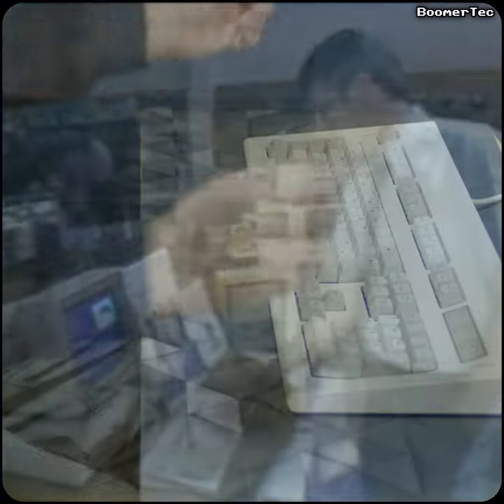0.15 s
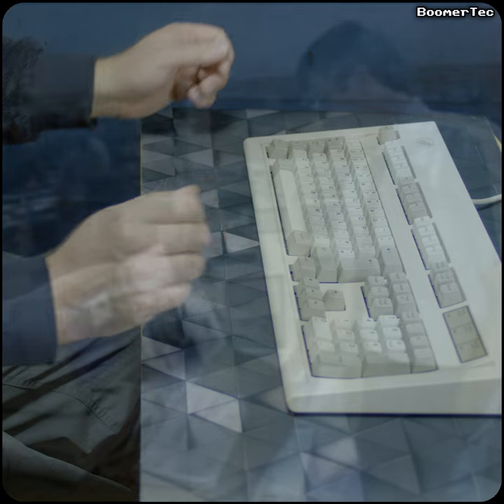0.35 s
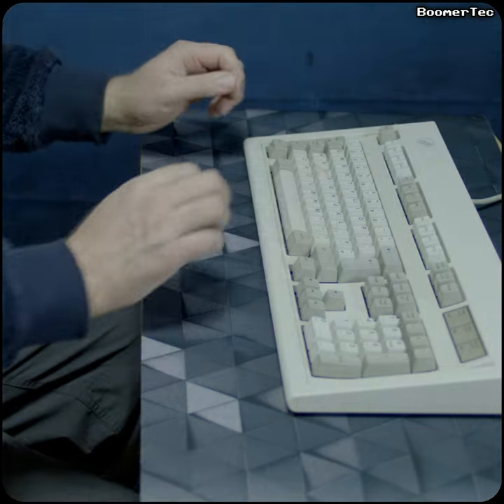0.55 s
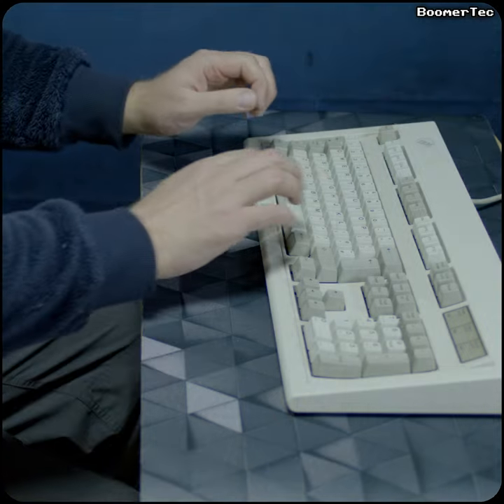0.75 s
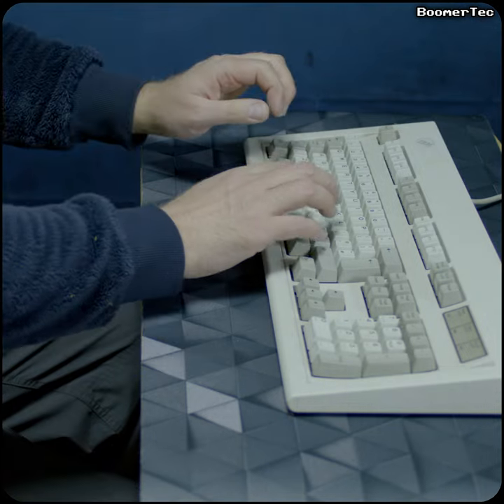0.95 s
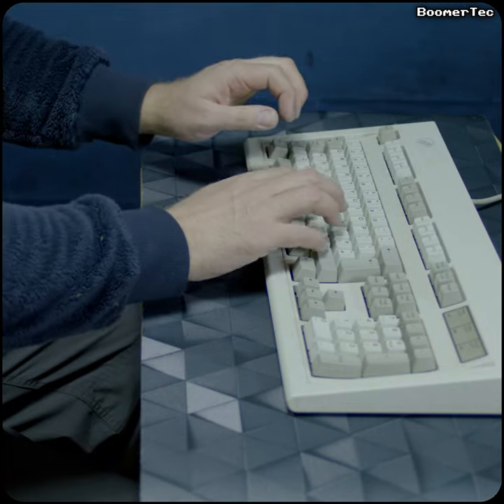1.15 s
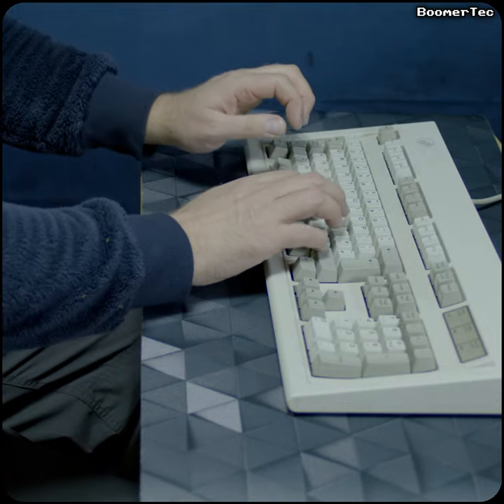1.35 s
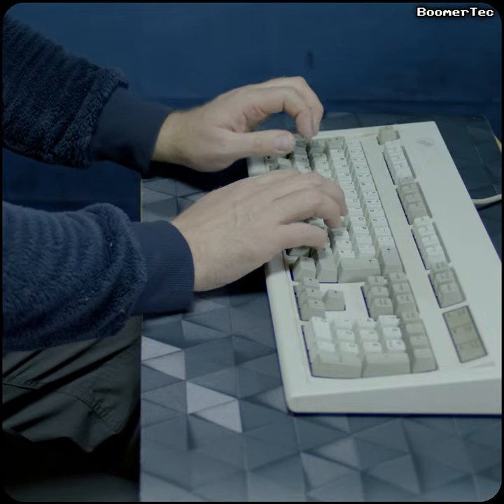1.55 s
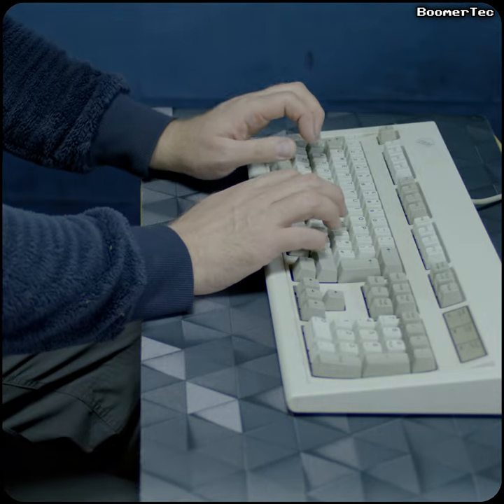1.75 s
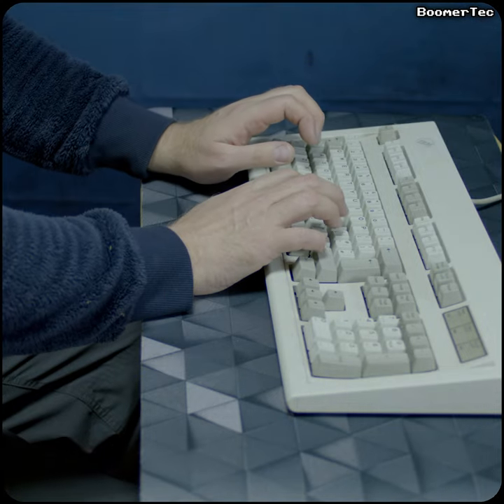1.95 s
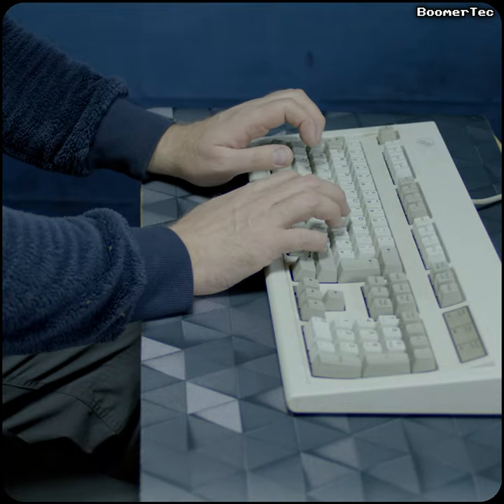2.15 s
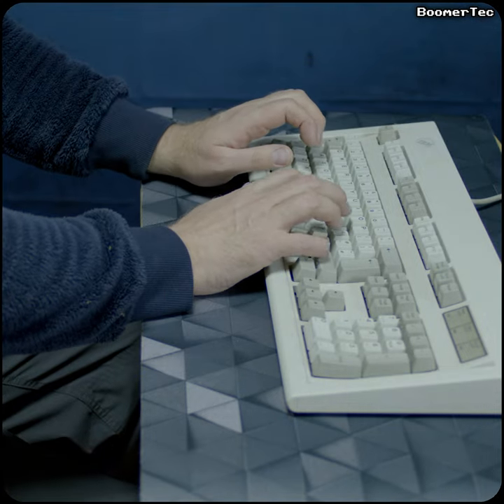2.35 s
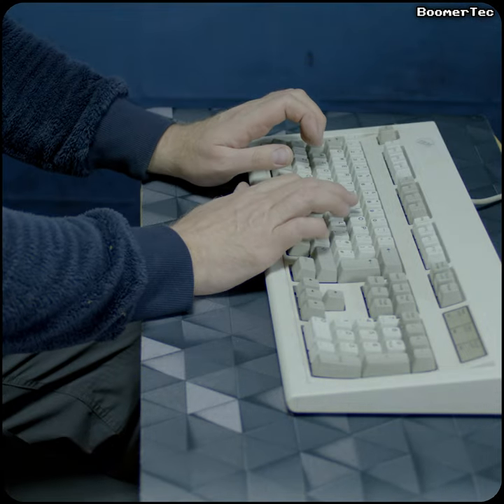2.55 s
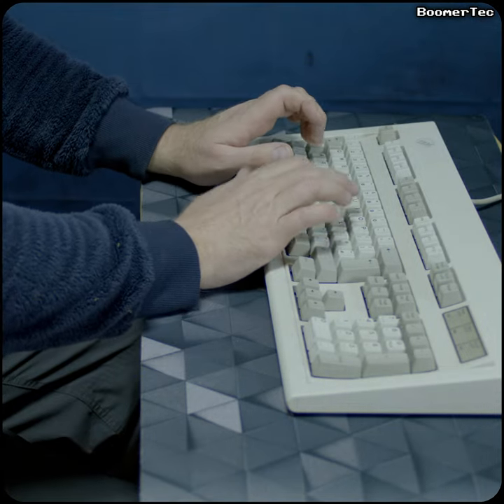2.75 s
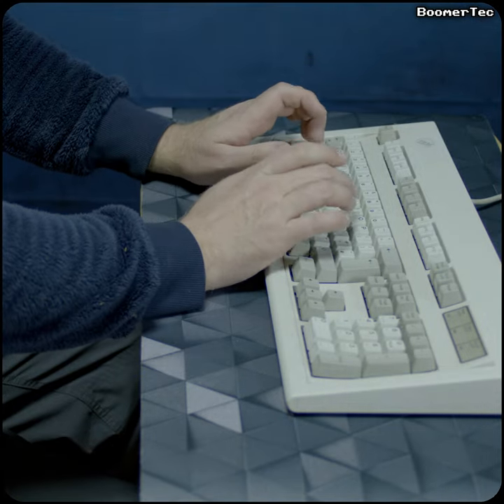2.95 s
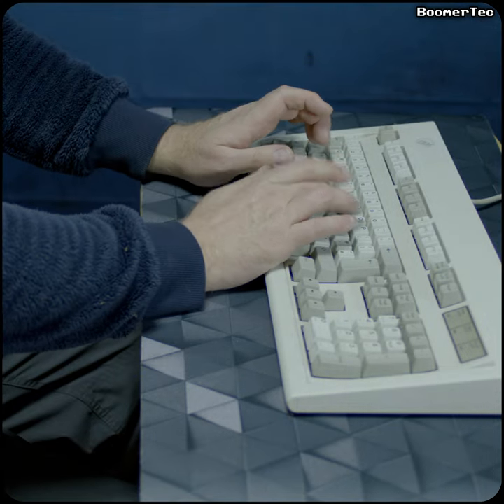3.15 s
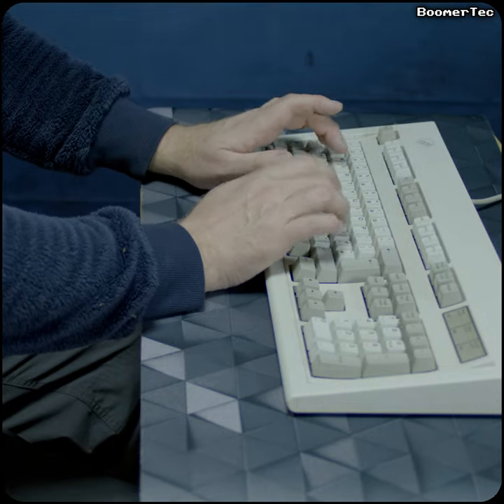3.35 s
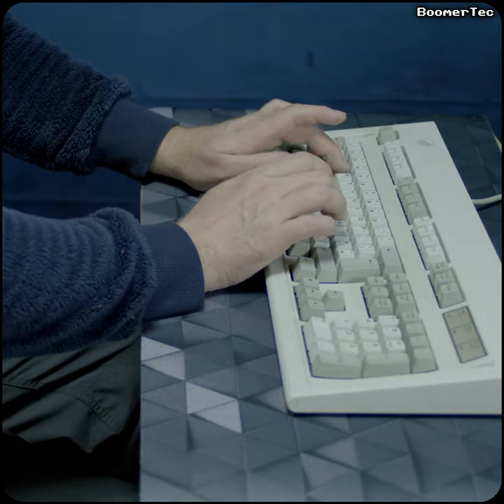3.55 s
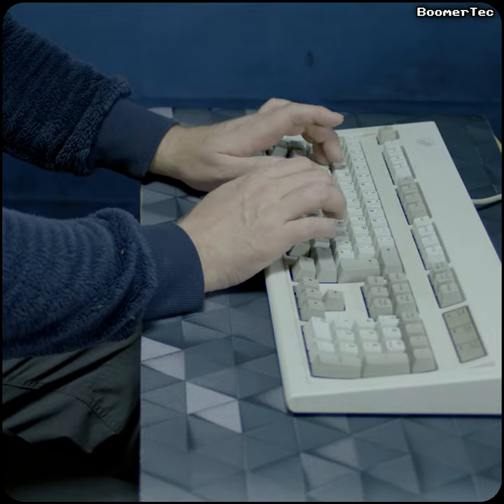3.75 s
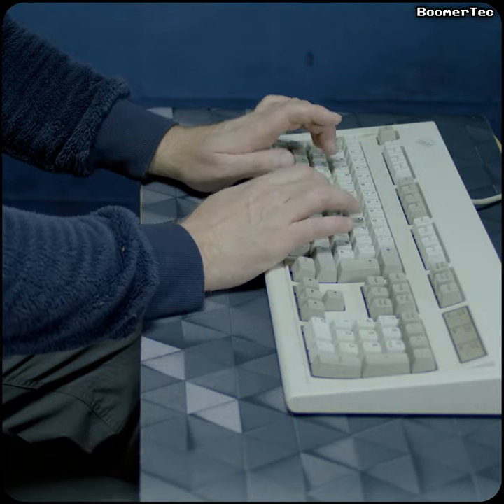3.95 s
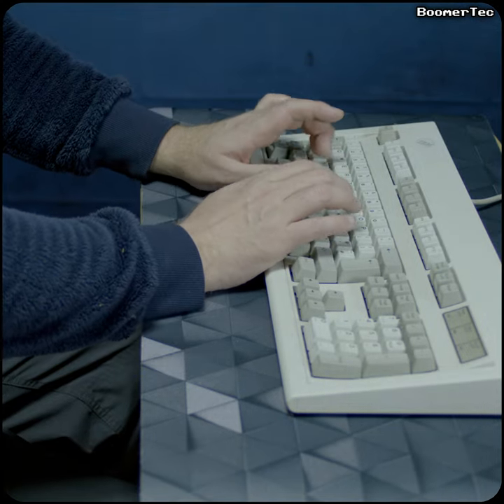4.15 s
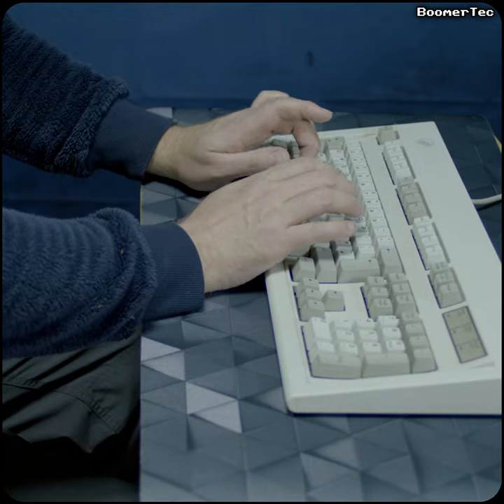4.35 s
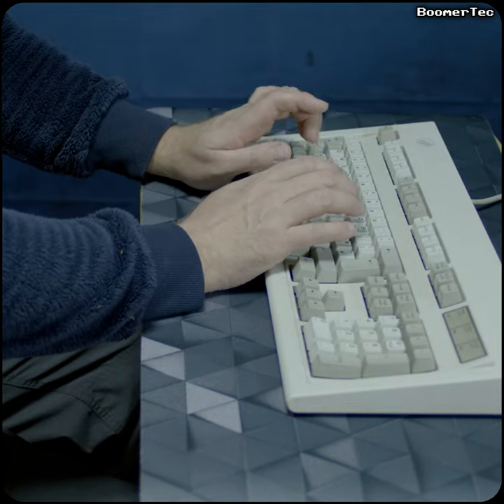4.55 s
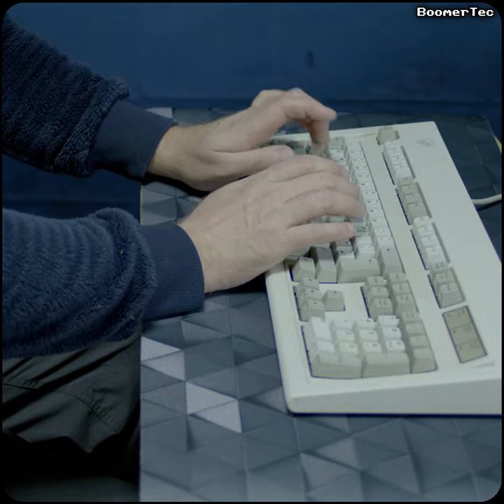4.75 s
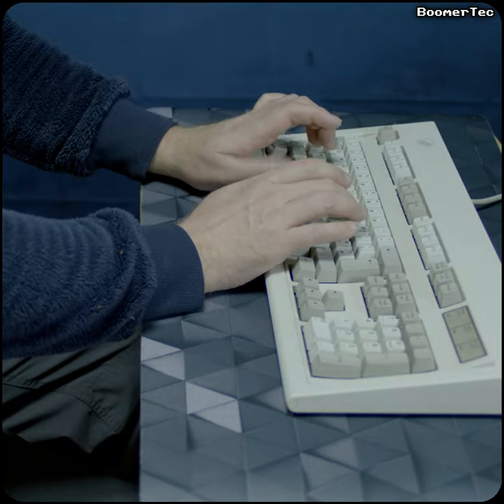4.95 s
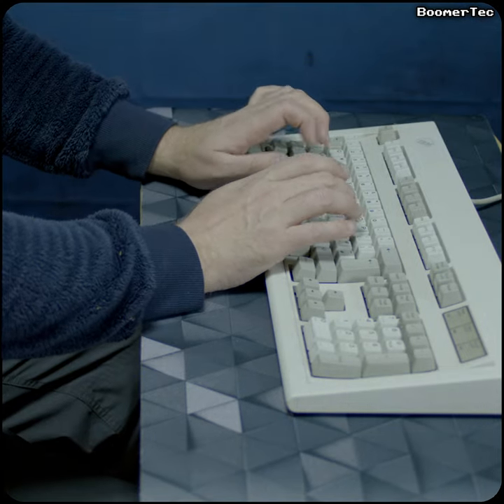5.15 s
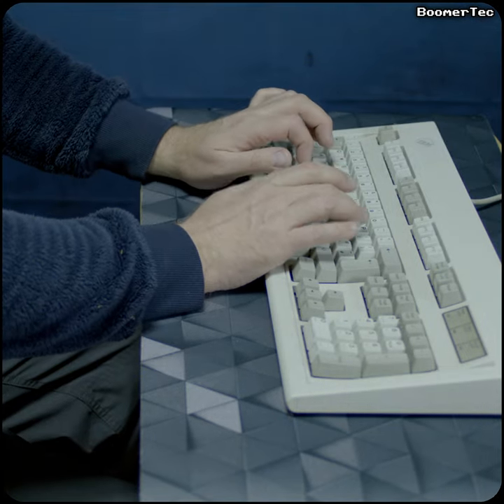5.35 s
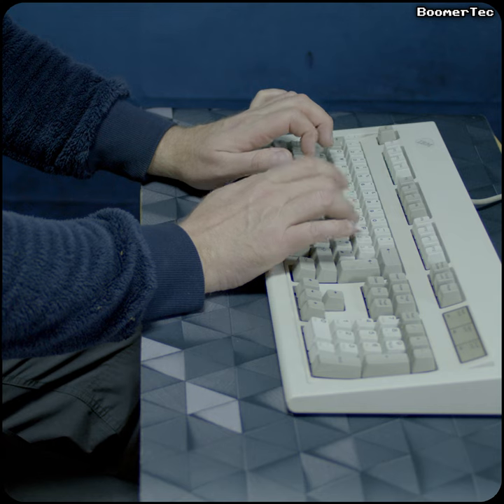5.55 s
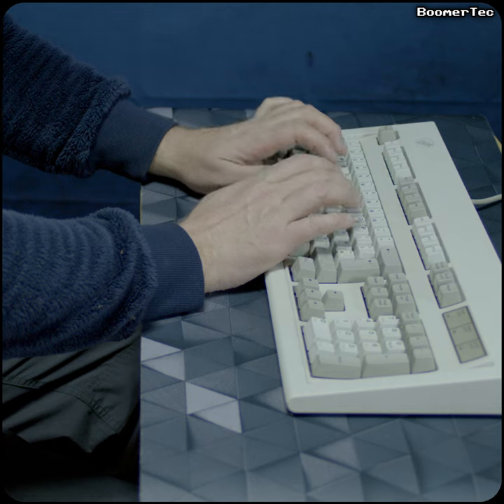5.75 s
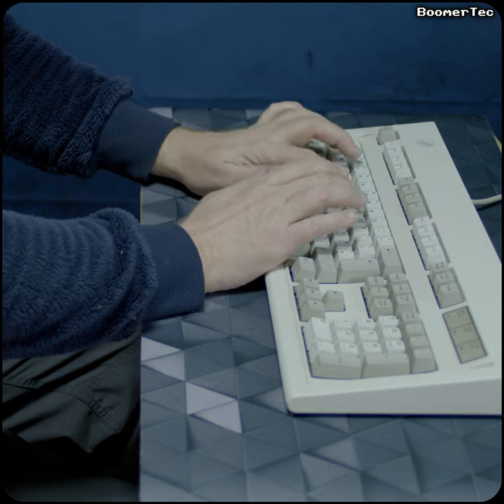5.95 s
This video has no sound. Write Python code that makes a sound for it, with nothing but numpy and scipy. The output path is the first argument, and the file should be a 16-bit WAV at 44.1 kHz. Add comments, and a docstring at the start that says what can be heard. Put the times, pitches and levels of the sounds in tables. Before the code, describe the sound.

Quiet room air with faint hiss, then a few barely audible scuffs as hands settle on a keyboard. After two seconds a few lighter clicks sound, then, following a short pause, fast bursts of crisp spring clacks with dull knocks. The space bar lands heavier and rattles on its wire as it rises. Close microphone, small dry room, almost mono, leaning slightly left.

```python
"""Faint hiss over low room air comes first, then a few soft scuffs of the hands, then fast typing in bursts.
The clicky spring keyboard lies on a desk in a small, dry room: shaped noise makes the hiss and the scuffs.
Each stroke is two noise bursts, a click and a dull knock (fingertip or landing), that ring cap and case.
The space bar lands harder and its wire rattles on the way up; a few springs sing on as decaying sines."""
import sys
import numpy as np
from scipy import signal
from scipy.fft import rfft, irfft, next_fast_len
from scipy.io import wavfile
from scipy.ndimage import uniform_filter1d

SR = 44100
rng = np.random.default_rng(int(sys.argv[2]) if len(sys.argv) > 2 else 0)


def wav_record(signal):
    """Record a signal, one row per channel, as 16-bit PCM in the file named by sys.argv[1]."""
    frames = np.transpose(np.atleast_2d(signal))
    bounded = np.clip(frames, -1, 1)
    # unit amplitude maps onto the largest positive 16-bit level
    quanta = np.round(bounded * 32767).astype(np.int16)
    wavfile.write(sys.argv[1], SR, quanta)


N = 265041


def amp(db):
    """Level law: decibels to amplitude gain."""
    return 10 ** (np.asarray(db) / 20)


def unit(x):
    """Power normalisation: x at rms 1."""
    return x / np.sqrt(np.mean(x ** 2) + 1e-20)


def along(points, hz):
    """Logarithmic frequency scale: (Hz, value) points interpolated along log frequency."""
    f, v = np.transpose(points)
    return np.interp(np.log(hz + 1), np.log(f + 1), v)


def filtered(x, response):
    """Linear filtering: the spectrum of x times a complex response of frequency."""
    n = x.shape[-1]
    padded = 2 * next_fast_len(n * 3 // 4)
    hz = np.fft.rfftfreq(padded, 1 / SR)
    return irfft(rfft(x, padded) * response(hz), padded)[..., :n]


def colour(points, hz):
    """Minimum phase: a causal response with the gains of (Hz, dB) points, silent before the blow."""
    cepstrum = irfft(np.log(amp(along(points, hz))))
    half = len(cepstrum) // 2
    # folding the cepstrum onto positive time makes the response causal
    cepstrum[1:half] *= 2
    cepstrum[half + 1:] = 0
    return np.exp(rfft(cepstrum))


def resonance(modes, hz):
    """Modal superposition: summed damped oscillators, each (Hz, width in Hz, peak dB)."""
    return sum(amp(db) * 1j * hz * w / (f * f - hz * hz + 1j * hz * w) for f, w, db in modes)


def add(out, s, sound):
    """Superposition: mix a sound in at s seconds."""
    start = round(s * SR)
    out[start:start + len(sound)] += sound


def background():
    """Stationary noise: faint hiss over the low murmur of the room's air, drifting slowly in level."""
    # Spectrum of hiss and air. Each row: frequency in Hz, relative density in dB.
    hiss_spectrum = [(20, -14), (60, -1.5), (150, -1.5), (470, -7), (1500, -10.5), (4100, -14.5),
                     (15800, -16.5)]
    # Level of the background. Each row: time in seconds, level in dB.
    quiet_level = [(0, -63.5), (.2, -68), (.7, -70), (1.1, -67.5), (1.6, -63.5), (6, -63)]
    level_db = np.interp(np.arange(N) / SR, *np.transpose(quiet_level))
    hiss = filtered(rng.standard_normal(N), lambda hz: amp(along(hiss_spectrum, hz)))
    return amp(level_db) * unit(hiss)


def brushes(attack_s=0.0038, t60_s=0.17):
    """Friction noise: hands settle on the keys with a few soft, narrow-band, decaying scuffs."""
    # Light brushes before typing. Each row: start in seconds, centre in Hz, width in Hz, gain in dB.
    scuffs = [(.645, 11800, 900, -48.5), (1.0, 286, 90, -38.5), (1.41, 11400, 900, -53)]
    t = np.arange(SR // 2) / SR
    out = np.zeros(N + SR)
    for s, f, width, db in scuffs:
        envelope = (1 - np.exp(-t / attack_s)) * amp(-60 * t / t60_s)
        rub = rng.standard_normal(len(t)) * envelope
        add(out, s, filtered(rub, lambda hz: resonance([(f, width, db)], hz)))
    return out[:N]


def springs(attack_s=0.0099):
    """Free vibration: now and then a released spring sings on with one thin, decaying sine."""
    # Springs left ringing. Each row: start in seconds, tone in Hz, level in dB, 60 dB decay in seconds.
    ringing = [(2.613, 1658, -64, 1.6), (3.851, 10700, -33.5, .24), (3.885, 10420, -52.5, 0.49)]
    out = np.zeros(N + SR)
    t = np.arange(SR) / SR
    for s, hz, db, t60_s in ringing:
        envelope = amp(db - 60 * t / t60_s) * (1 - np.exp(-t / attack_s))
        add(out, s, envelope * np.sin(2 * np.pi * hz * t))
    return out[:N]


def room_tail(length):
    """Diffuse reverberation: dense reflections as noise, each frequency dying at its own speed."""
    # Reverberation of the room. Each row: frequency in Hz, 60 dB decay in seconds.
    reverberation = [(100, 0.48), (300, 0.26), (2000, 0.29), (5000, 0.29), (13000, 0.23)]
    hz, t, z = signal.stft(rng.standard_normal(length), SR, nperseg=256)
    decay = amp(-60 * t / along(reverberation, hz)[:, None])
    return signal.istft(z * decay, SR, nperseg=256)[1][:length]


def blow(strengths, common, crack_t60_s, attack_s, room_db, alike,
         grain_db=1, grain_s=0.0017, desk_db=-11, desk_s=0.0013):
    """Impact excitation: a short crack and its reflections, whose power share `alike` is always the same."""
    # Where the strengths of a contact act, in Hz: thump, clack, click, snap.
    registers_hz = [230, 900, 3200, 10000]
    t = np.arange(len(common)) / SR
    alike = np.clip(alike, 0, 1)
    onset = 1 - np.exp(-t / attack_s)
    crack = rng.standard_normal(len(t)) * amp(-60 * t / crack_t60_s)
    tail = np.sqrt(alike) * common + np.sqrt(1 - alike) * room_tail(len(t))
    # loose caps and springs chatter, so the decay is grainy
    grain = uniform_filter1d(rng.standard_normal(len(t)), max(1, round(grain_s * SR)))
    chatter = unit(amp(grain_db * unit(grain)))
    sound = (crack + amp(room_db) * tail * chatter) * onset
    # small parts radiate little bass: that comes from one push into the desk
    push = amp(desk_db) * (1 - t / desk_s) * np.exp(-t / desk_s) * onset
    sound = filtered(sound, lambda hz: 1j * hz / (1j * hz + 110)) + push
    register_gains = list(zip(registers_hz, strengths))
    return filtered(sound, lambda hz: colour(register_gains, hz))


def pings(low_hz, high_hz, width_hz, db, count):
    """Modal scatter: a few sharp modes, different at each contact, as (Hz, width in Hz, dB)."""
    centres = np.geomspace(low_hz, high_hz, count) * np.exp(rng.normal(0, 0.147, count))
    return [(f, width_hz, db) for f in centres]


def driven(modes, case_db):
    """Modal participation: where the key sits sets how strongly the modes under 800 Hz ring."""
    return [(f, width, db + case_db * (f < 800)) for f, width, db in modes]


def bar_presses():
    """Impact sequence: thumb touches, spring snaps, bar lands: (s, strengths in dB, low-mode drive in dB)."""
    # Presses. Each row: snap time in seconds, level in dB, lead of the thumb's touch in seconds,
    # extra weight in the bass in dB, drive of the low modes in dB.
    presses = [(3.6631, -1, 0.0047, -5, 3.5), (4.144, -0.5, 0.0044, -1, 1), (5.042, 0, .005, 0.5, 1.5),
               (5.298, -0.5, .005, 1.5, -17), (5.729, -2.2, 0.0092, 6.5, -6.5)]
    # Contacts. Each list: thump, clack, click, snap in dB.
    touch_db = [-25, -25, -23.5, -25]
    snap_db = [-24, -0.5, -7, -10]
    landing_db = [-15.5, -11, -11.5, -21]
    # Share of the weight that thump, clack, click and snap get (ratio).
    weight_share = [1, .15, 0, 0]
    landing_s = .0027  # from the snap to the landing
    for s, db, lead, weight_db, case_db in presses:
        force_db = db + weight_db * np.array(weight_share)
        yield s - lead, force_db + touch_db, case_db
        yield s, force_db + snap_db, case_db
        yield s + landing_s, force_db + landing_db, case_db


def bar_releases(count=2, case_db=0):
    """Inelastic rebound: the rising bar ticks along its wire, hits the top stop and bounces ever faster."""
    # Releases. Each row: start in seconds, level in dB, rise time to the top stop in seconds.
    releases = [(3.7895, -0.5, .021), (4.2573, -1, 0.02), (5.1661, 0.5, .021), (5.8291, -2, 0.02)]
    # Contacts. Each list: thump, clack, click, snap in dB.
    unseat_db = [-33, -6.5, -18, -16]
    chatter_db = [-20, -17, -11.5, -28]
    stop_db = [-25.5, -7, -11, -13.5]
    # first flight in seconds, ratio of the next to it, loss at each bounce in dB
    bounce_s, bounce_shrink, bounce_loss_db = .024, .45, 7
    scatter_db = 2.5  # chance in the strength of each tick
    for s, db, rise in releases:
        yield s, np.add(db, unseat_db), case_db
        for k in range(count):
            tick_db = db + scatter_db * rng.standard_normal()
            yield s + rise * (k + 1) / (count + 1), np.add(tick_db, chatter_db), case_db
        for k in range(count + 1):
            flight = bounce_s * sum(bounce_shrink ** j for j in range(k))
            yield s + rise + flight, np.add(db - bounce_loss_db * k, stop_db), case_db


def bar_contacts(rows, crack_t60_s, attack_s, room_db):
    """Modal excitation: the long bar touches at a new spot each time, waking other modes beside its own."""
    # Resonances of the space bar. Each row: frequency in Hz, width in Hz, peak in dB.
    bar_modes = [(345, 40, 2), (455, 38, 14), (903, 25, -2), (1325, 30, 1), (2250, 50, -1), (2369, 24, 4),
                 (2455, 22, 1), (2730, 40, -2), (3260, 35, -2), (3764, 35, -1), (3916, 30, 2),
                 (3964, 22, 1), (4122, 50, -2), (5880, 18, 4), (6357, 16, 0), (9050, 120, -3)]
    out, common = np.zeros(N + SR), room_tail(SR // 3)
    for s, strengths, case_db in rows:
        sound = blow(strengths, common, crack_t60_s, attack_s, room_db, alike=0.2)
        spot = pings(2800, 12000, width_hz=70, db=1, count=7)
        own = driven(bar_modes, case_db)
        add(out, s, filtered(sound, lambda hz: (1 + resonance(spot, hz)) * (1 + resonance(own, hz))))
    return out[:N]


def space_bar():
    """Coupled resonators: the bar slams down; on its return it chatters against its steel wire."""
    # Resonances of the wire. Each row: frequency in Hz, width in Hz, peak in dB.
    wire_modes = [(2360, 22, 3), (4100, 700, -2)]
    # Overall colour of the bar's plastic. Each row: frequency in Hz, gain in dB.
    bar_tone = [(40, 5.5), (200, -1), (350, -0.5), (560, 1.5), (900, -1.5), (1800, -1), (2600, 0.5),
                (4300, 3.5), (5400, 0), (8300, 1), (12000, 0.5), (15500, -3.5)]
    down = bar_contacts(bar_presses(), crack_t60_s=0.017, attack_s=0.00097, room_db=-18.0)
    up = bar_contacts(bar_releases(), crack_t60_s=0.014, attack_s=0.0013, room_db=-18.5)
    up = filtered(up, lambda hz: 1 + resonance(wire_modes, hz))
    return filtered(amp(3.5) * down + amp(2.0) * up, lambda hz: colour(bar_tone, hz))


def key_contacts(soft_attack_s=0.0011, hard_attack_s=0.00045):
    """Contact stiffness: a click, brighter the harder it is, and a dull knock before or after it."""
    # Keystrokes. Each row: click time in seconds, keycap pitch in Hz, level in dB, hardness from 0 to 1,
    # delay of the knock in seconds (negative: fingertip, else: landing), knock in dB, low-mode drive in dB.
    keys = [(2.3347, 1900, -20.5, .9, 0.0055, -11, -18), (2.4894, 3840, -11, 0.8, -0.011, -32, -0.5),
            (2.569, 3150, -20, 0.22, .0045, -20, 2), (2.6139, 1590, -25, 0.47, -0.0012, -20, 4),
            (3.2336, 2460, -12, 0.61, -0.0086, -16, 1), (3.2891, 910, -16, 0.38, 0.0054, -21, 11.5),
            (3.4446, 1780, -15, 0.88, -0.012, -27, -18), (3.5098, 650, -17, 0.3, 0.022, -26, 12.5),
            (3.5469, 2670, -14.5, 0.88, -0.0097, -36, -1), (3.6094, 2170, -14.5, 0.6, -.0136, -16, -15),
            (3.7248, 1060, -17, 0.4, 0.026, -19, 11), (4.038, 2720, -12, 0.71, -0.0095, -18.5, 5),
            (4.0805, 896, -12.5, 0.9, .0294, -16, 10), (4.8611, 860, -11, 0.93, -0.0066, -13.5, 7.5),
            (4.9339, 750, -16, 0.96, -0.0029, -17, 10.5), (5.0095, 730, -16.5, 0.38, 0.02, -28, 6),
            (5.3792, 1450, -17.5, 1, -0.0094, -15.5, 8), (5.4551, 677, -16, 0.43, -0.02, -25, 3.5),
            (5.5252, 2420, -18.5, 0.8, 0.026, -27, 1), (5.5558, 2270, -14.5, 0.58, 0.011, -21, 8.5),
            (5.6475, 2240, -16.5, 1, -0.011, -14.5, -2), (5.8904, 1430, -8.5, 0.47, -0.022, -27, 6),
            (5.948, 1300, -14, 0.77, -0.0027, -17.5, 12)]
    # Contacts. Each list: thump, clack, click, snap in dB.
    soft_db = [-19, 7, -10, -17.5]
    hard_db = [-7, -1.4, -1.5, 0]
    finger_db = [-18, 6.5, -12.5, -12]
    bottom_db = [-15, -3, -4, -19]
    for s, cap_hz, db, hardness, delay, knock_db, case_db in keys:
        click = np.add(soft_db, np.clip(hardness, 0, 1) * np.subtract(hard_db, soft_db))
        knock = finger_db if delay < 0 else bottom_db
        yield s, cap_hz, db + click, hard_attack_s, case_db
        yield s + delay, cap_hz, np.add(knock_db, knock), soft_attack_s, case_db


def letter_keys(cap_q=7, cap_db=0):
    """Resonators in series: each small key rings with its own cap and spring, then through the case."""
    # Resonances of the case. Each row: frequency in Hz, width in Hz, peak in dB.
    case_modes = [(461, 30, 9), (736, 22, -2), (820, 25, -1), (1328, 30, 1), (2054, 30, 0), (2745, 50, -2),
                  (7250, 200, -4), (10150, 160, 0)]
    # Overall colour of the plastic. Each row: frequency in Hz, gain in dB.
    letter_tone = [(40, 9), (200, 1.5), (350, -1), (560, -3), (900, -1), (1800, 0.5), (2500, 0.5),
                   (3600, -1), (6000, -1.5), (8300, -4), (11000, -1), (15500, -7)]
    out, common = np.zeros(N + SR), room_tail(SR // 3)
    for s, cap_hz, strengths, attack_s, case_db in key_contacts():
        sound = blow(strengths, common, crack_t60_s=0.022, attack_s=attack_s, room_db=-13.5, alike=0.22)
        spring = pings(2000, 12000, width_hz=130, db=1, count=7)
        key = [(cap_hz, cap_hz / cap_q, cap_db)] + spring
        case = driven(case_modes, case_db)
        add(out, s, filtered(sound, lambda hz: (1 + resonance(key, hz)) * (1 + resonance(case, hz))))
    return amp(0.46) * filtered(out[:N], lambda hz: colour(letter_tone, hz))


def stereo(x, side_db, side_t60_s):
    """Mid and side: almost mono, a little to the left, with first wall echoes of opposite sign."""
    # Lean to the left. Each row: frequency in Hz, excess of left over right in dB.
    left_lean = [(30, 0), (180, 1.56), (2500, 1.5), (11000, 0.25)]
    t = np.arange(SR // 20) / SR
    walls = rng.standard_normal(len(t)) * amp(-60 * t / side_t60_s)
    walls = walls / np.linalg.norm(walls)
    side = amp(side_db) * signal.fftconvolve(x, walls)[:N]
    panned = filtered(x, lambda hz: amp(np.outer([.5, -.5], along(left_lean, hz))))
    return panned + [side, -side]


def scene():
    """Superposition of sources: the keyboard on its ringing plate, the hands and the quiet room."""
    # Lingering tone of the steel plate. Each row: frequency in Hz, width in Hz, peak in dB.
    plate_modes = [(716, 2.5, -1.5)]
    keyboard = filtered(letter_keys() + space_bar(), lambda hz: 1 + resonance(plate_modes, hz))
    return stereo(keyboard + springs() + brushes() + background(), side_db=-27.5, side_t60_s=0.038)


def record(dry):
    """Band limitation: a very steep low-pass takes away the sound above its cutoff."""
    top_hz = 15900
    return filtered(dry, lambda hz: 1 / np.sqrt(1 + (hz / top_hz) ** 240))


dry = scene()
out = record(dry)
wav_record(out)
```